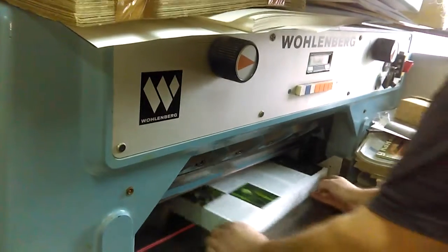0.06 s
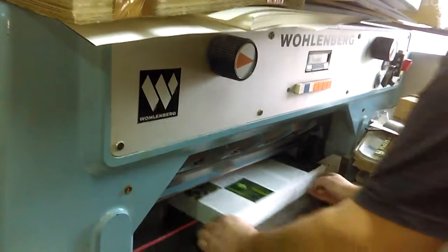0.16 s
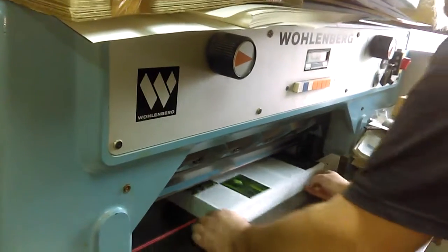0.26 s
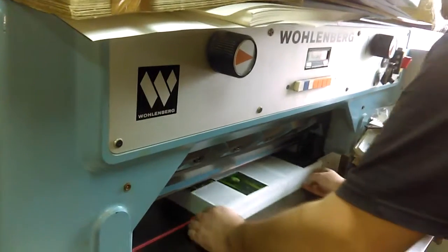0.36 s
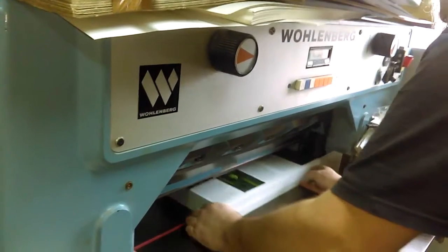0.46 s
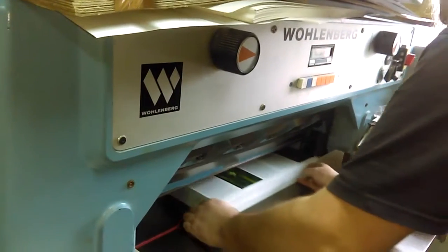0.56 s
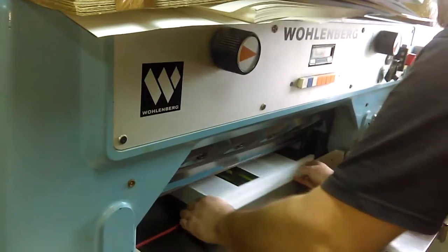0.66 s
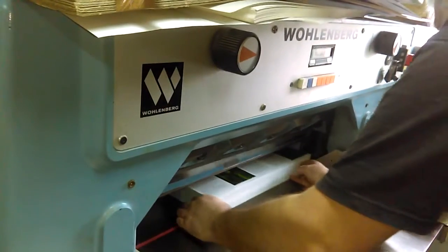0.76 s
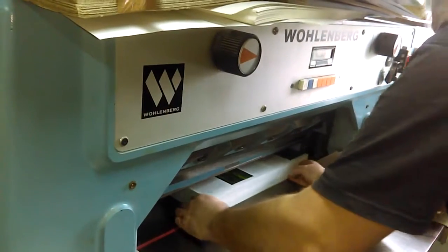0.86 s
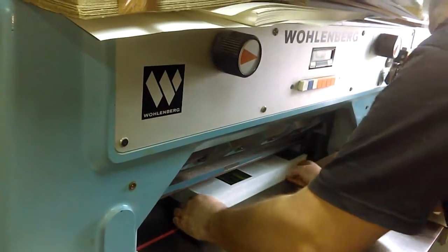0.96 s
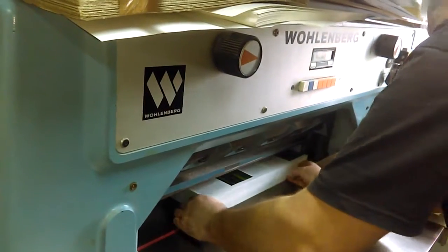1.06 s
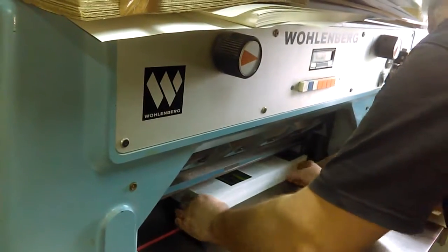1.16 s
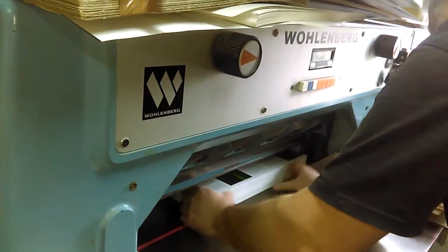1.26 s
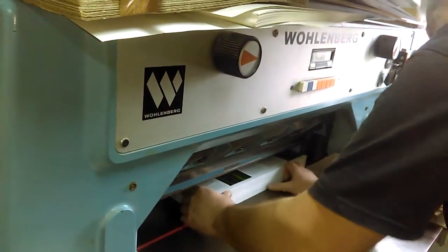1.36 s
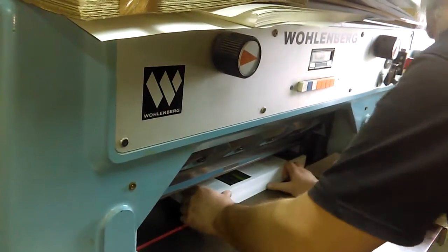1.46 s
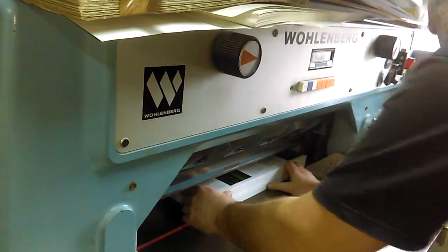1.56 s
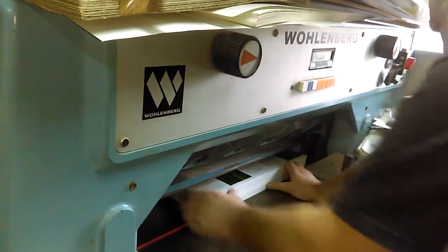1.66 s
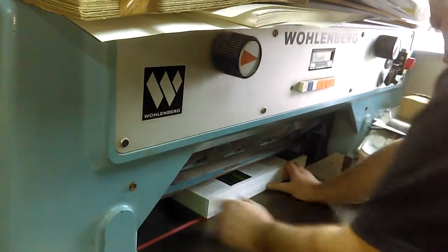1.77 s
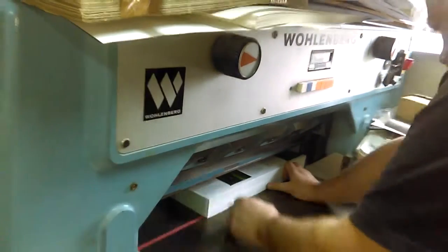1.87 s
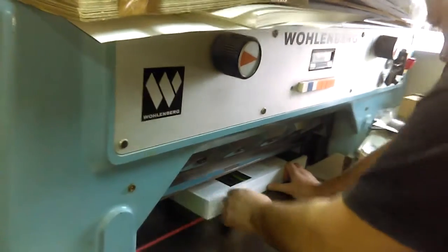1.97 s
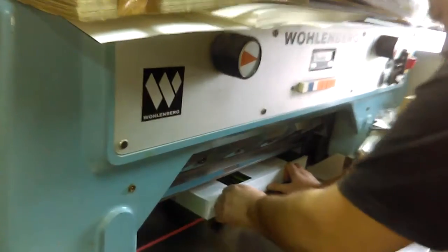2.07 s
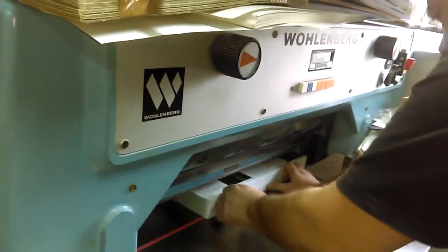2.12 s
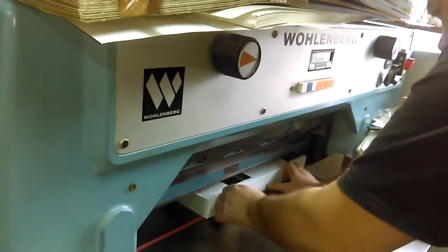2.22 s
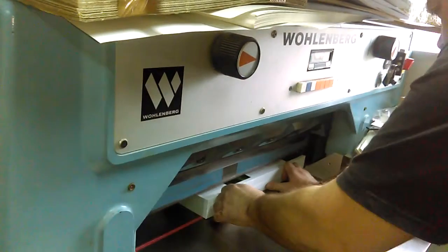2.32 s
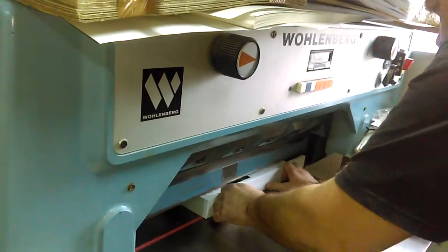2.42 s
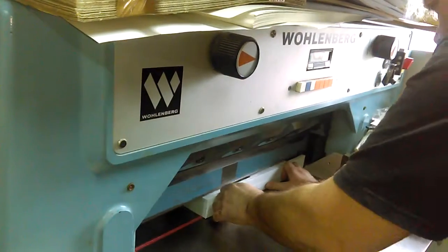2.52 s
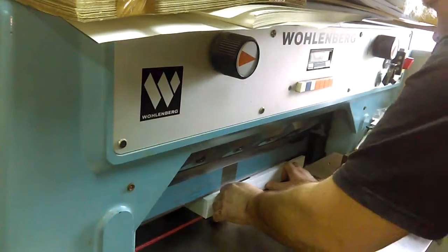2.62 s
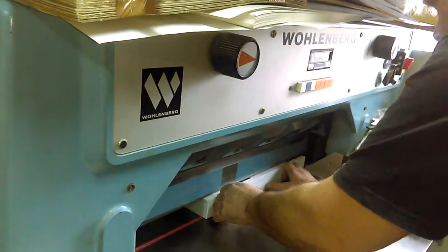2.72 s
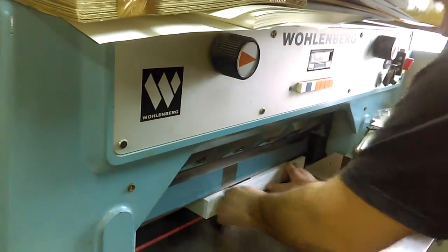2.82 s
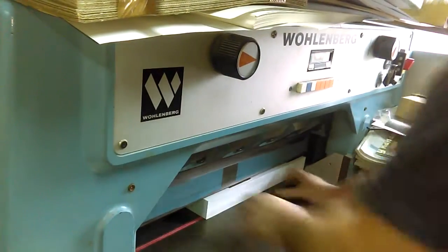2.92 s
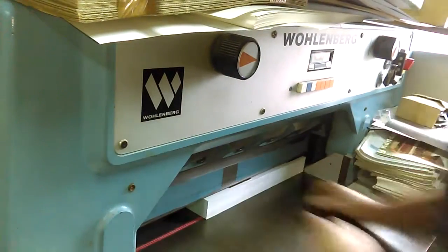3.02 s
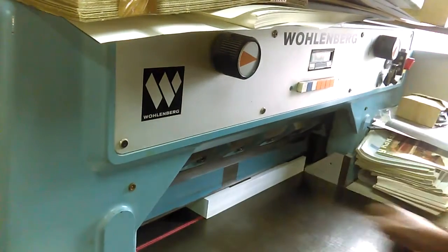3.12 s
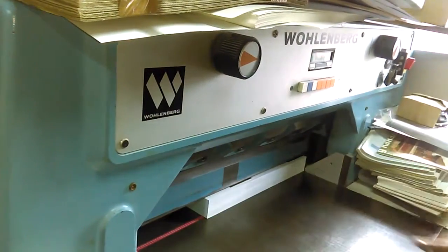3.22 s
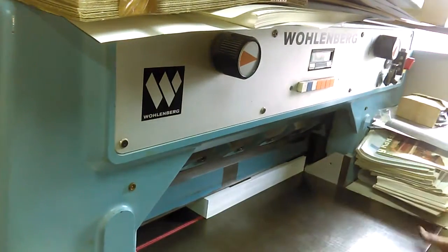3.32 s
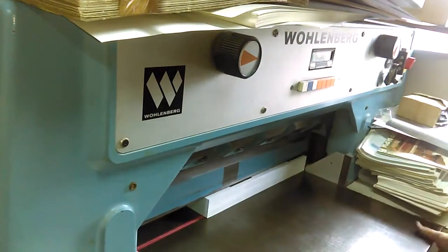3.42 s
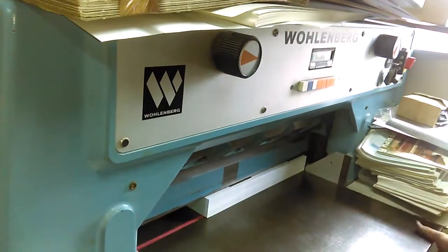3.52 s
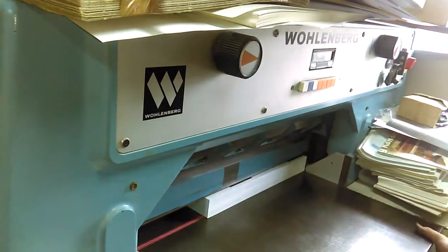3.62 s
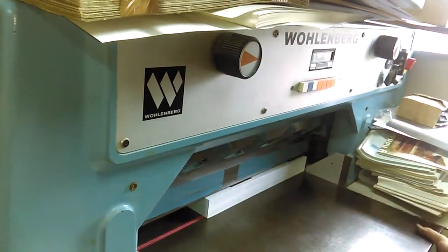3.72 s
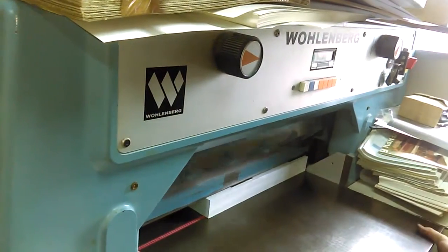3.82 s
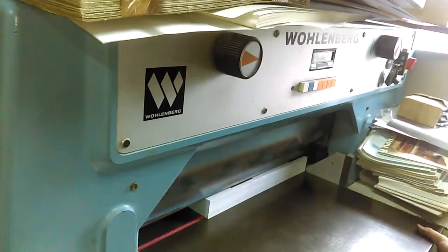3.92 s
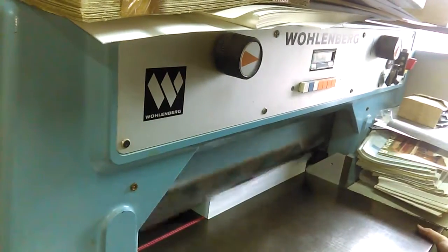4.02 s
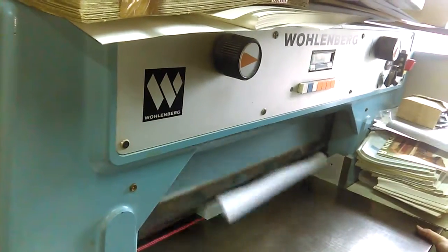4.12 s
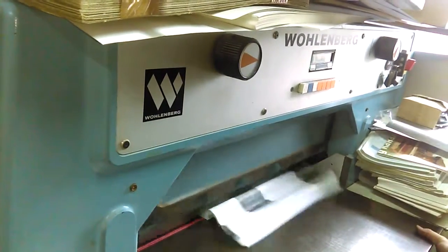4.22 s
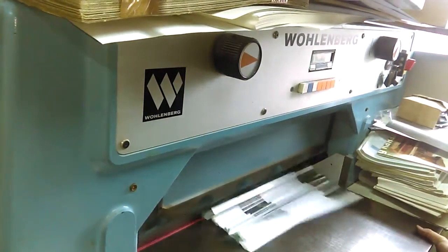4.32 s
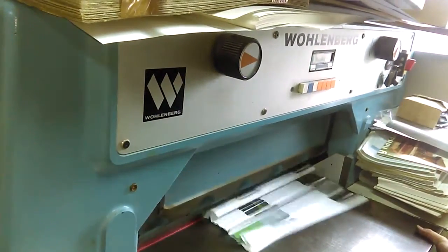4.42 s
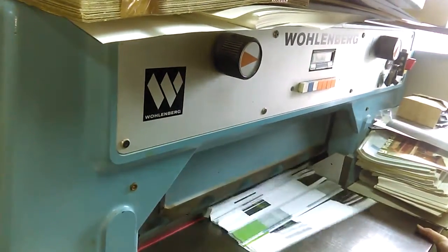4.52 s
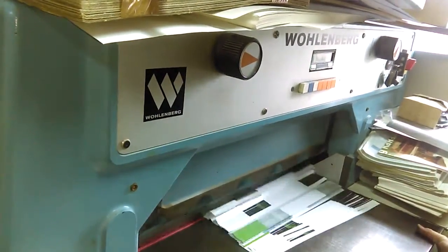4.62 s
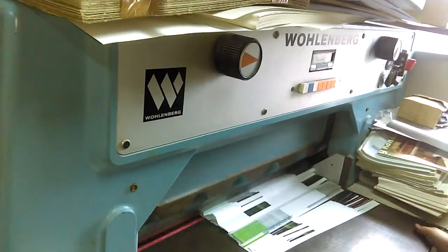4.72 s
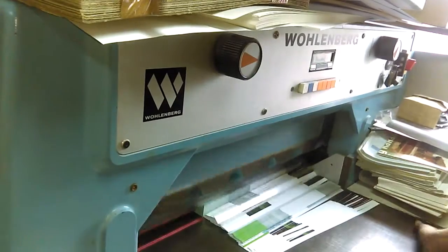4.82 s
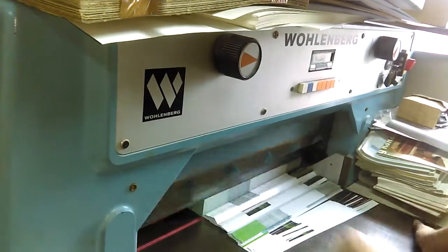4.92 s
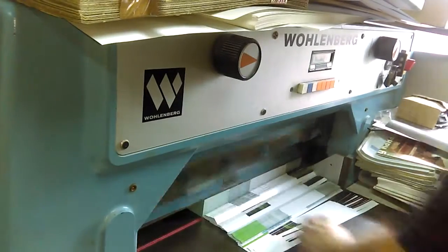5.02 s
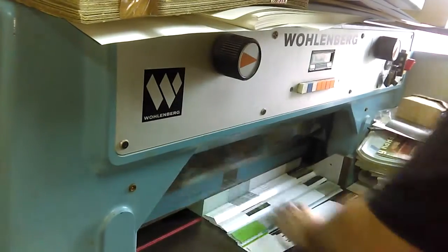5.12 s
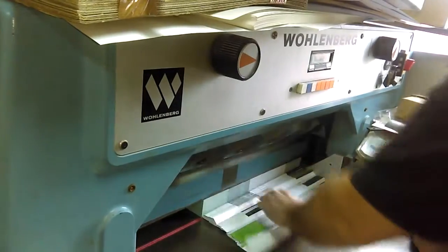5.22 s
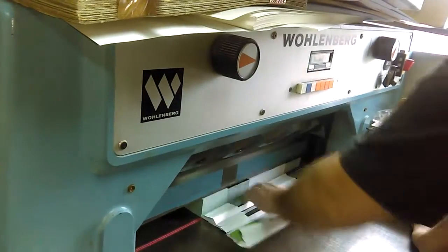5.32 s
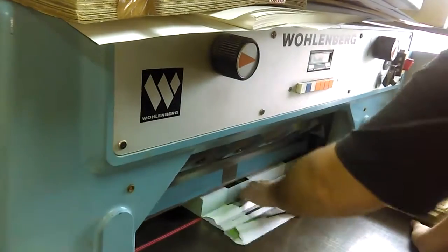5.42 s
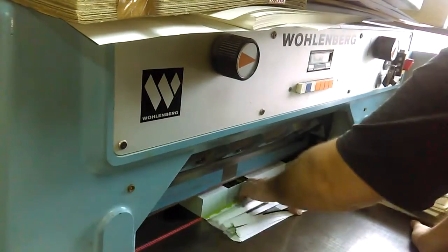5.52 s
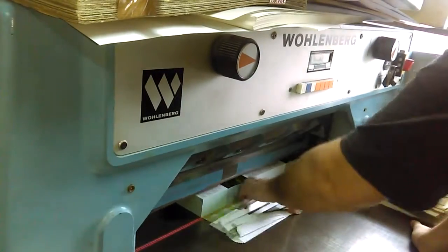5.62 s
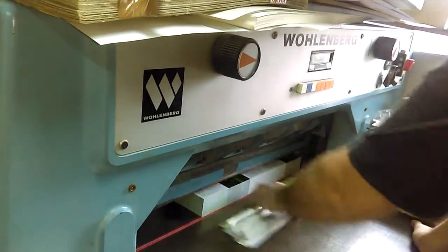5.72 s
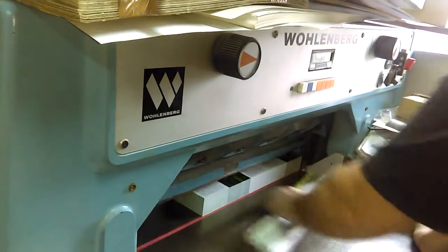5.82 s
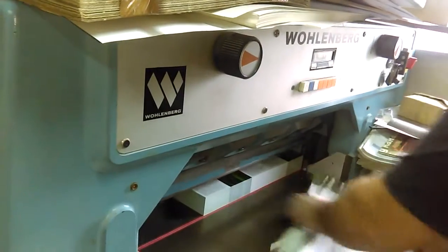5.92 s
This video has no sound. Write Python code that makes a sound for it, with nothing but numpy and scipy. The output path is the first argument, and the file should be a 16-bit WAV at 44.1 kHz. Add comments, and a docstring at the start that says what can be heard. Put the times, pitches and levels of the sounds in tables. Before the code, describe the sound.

Paper knocks and slides over a motor hum, before a guillotine cutter squeals, slams, zips through the stack and clunks to a stop.

```python
"""A small print shop. A guillotine paper cutter idles with a mains hum while a stack is knocked square
and slid under the blade. The clutch bites with a squeal, the pump groans and the clamp slams down.
The knife snaps sheet after sheet: a zip that falls in pitch as the crank slows, over hissing fibres.
The gears carry the knife back up, the brake chirps, and the offcuts are gathered."""
import sys
import numpy as np
from scipy import signal
from scipy.fft import rfft, irfft, next_fast_len
from scipy.io import wavfile

SR = 44100
rng = np.random.default_rng(int(sys.argv[2]) if len(sys.argv) > 2 else 0)


def bounce(signal):
    """Save signal as a 16-bit WAV file at the path given by the first command-line argument."""
    frames = np.transpose(np.atleast_2d(signal))
    limited = np.clip(frames, -1, 1)
    pcm = np.round(limited * 32767).astype(np.int16)
    wavfile.write(sys.argv[1], SR, pcm)


N = 263393
TIME_S = np.arange(N) / SR
FFT_SIZE = next_fast_len(N + SR // 2, True)
BINS_HZ = np.maximum(np.arange(FFT_SIZE // 2 + 1) * SR / FFT_SIZE, 1)
SIDES = np.array([[1], [-1]])   # left, right

MAINS_HZ, SHAFT_HZ = 50, 24.77
CLUTCH_S, CLAMP_TIGHT_S, UPSTROKE_S, BRAKE_S = 3.68, 3.94, 4.6, 5.25
CUT_START_S, ZIP_END_S, CUT_END_S = 4.059, 4.38, 4.45

# Motor hum. Each row: multiple of mains frequency, rms level in dB.
HUM_LINES = [(2, -59), (2.5, -62), (3.5, -67), (4, -56.5), (4.5, -60), (6, -54.5), (8, -70.5), (12.5, -76),
             (14, -61.5), (26, -67.5), (34, -74.5), (36, -70), (37, -77.5), (38, -70.5), (60, -72)]
# Motor whine. Each entry: multiple of mains frequency.
WHINE_MULTIPLES = [12, 16, 18]
# Whine shifts as the operator moves. Each row: time in seconds, level of each of the three lines in dB.
WHINE_LEVELS = [(0, -74, -58, -55.5), (0.55, -62.5, -56, -54), (1.2, -51.5, -55, -55.5),
                (2.0, -53, -57, -56), (2.55, -68, -58.5, -60), (3.0, -59.5, -56.5, -52),
                (3.55, -54.5, -51, -47), (5.6, -61, -58, -56), (5.97, -58, -56, -46)]
# Gear tooth tones. Each row: multiple of shaft speed, rms level in dB.
TOOTH_LINES = [(4, -39.5), (5, -40), (6, -44), (10, -34), (14, -38), (17, -51.5), (20, -46), (25, -47.5),
               (30, -45), (36, -50.5), (60, -49.5), (70, -59), (90, -47.5), (111, -53)]

# Noise colours. Each row: frequency in Hz, relative spectral density in dB.
FAN_SPECTRUM = [(25, -17), (48, -15), (72, -15), (100, 0.5), (210, -6), (400, -8.5), (800, -8.5),
                (1050, -10.5), (1800, -16), (2500, -21.5), (4500, -31), (7000, -35), (10000, -31.5),
                (16000, -42)]
SLIDE_SPECTRUM = [(1200, -24), (2200, -3), (3000, -2.5), (6500, -11), (9500, -0.5), (12500, -6.5),
                  (16000, -18)]
KNOCK_SPECTRUM = [(35, -38), (60, -9.5), (417, -1.5), (615, -5.5), (886, -4.5), (1040, 2), (1140, 1.5),
                  (1310, -4.5), (1970, -7), (3040, -18.5), (3730, -20.5), (4470, -30), (9290, -40),
                  (14000, -51)]
TAP_SPECTRUM = [(710, -52), (1200, -5), (1680, -3.5), (2230, -3.5), (4130, -4.5), (6720, -9.5), (8720, -4),
                (13500, -16), (16000, -36)]
CLUTCH_SPECTRUM = [(41, -32.5), (70, -27), (182, -3), (368, -12), (494, -19), (815, -5), (913, -12.5),
                   (2070, -9.5), (2540, -15), (2780, -14.5), (4090, -20.5), (5500, -13), (7220, -21),
                   (12500, -16.5), (16000, -41)]
CLAMP_SPECTRUM = [(41, -45), (70, -19), (204, -5.5), (268, -12.5), (336, 2.5), (412, -7), (1150, -12),
                  (1250, -13.5), (1650, -11), (2780, -24), (3260, -25.5), (7060, -40.5), (10900, -30),
                  (13600, -40), (16000, -75)]
BRAKE_SPECTRUM = [(41, -40), (70, -14), (256, -5), (336, -2.5), (494, 1), (541, -10.5), (797, -7.5),
                  (1510, -15), (2660, -14.5), (3740, -27), (5140, -28.5), (6750, -31.5), (10400, -29.5),
                  (11400, -33), (16000, -44)]
WHIRR_SPECTRUM = [(40, -16), (70, -12), (120, -7), (220, -15), (400, -14), (780, -12), (1200, -14),
                  (1900, -22), (3000, -23.5), (3600, -32), (5500, -33), (7200, -43.5), (9500, -31.5),
                  (15500, -51)]
FIBRE_SPECTRUM = [(1500, -9.5), (2500, 0), (3300, -1.5), (4200, -7), (5200, -4.5), (8300, -2),
                  (11000, -2.5), (13300, -7), (16000, -22)]
CRUNCH_SPECTRUM = [(120, -34), (300, -33), (470, -2), (900, 5), (1300, 0), (2200, -18), (3500, -12),
                   (6000, -18), (9000, -45)]
# Colour of the zip. Each row: frequency in Hz, gain in dB.
ZIP_RESPONSE = [(250, -1), (500, 1.5), (1200, -0.5), (2200, 8), (3500, 1), (5500, -6), (8500, 1.5),
                (12000, 5)]

# Impacts. Each row: start in seconds, level in dB, T60 as a multiple of the shop's, tilt in dB/octave.
STACK_HITS = [(0.323, -38, 0.53, -0.5), (0.356, -37, 0.72, -1.5), (0.973, -24.5, 0.8, -0.1),
              (2.061, -20, 0.94, 1)]
EDGE_TAPS = [(1.665, -48.5, 0.83, -1.5), (2.535, -52.5, 0.26, 3.5), (2.656, -48.5, 1.05, 0),
             (2.811, -53, 0.84, 2), (2.838, -47.5, 0.64, 0.3), (3.422, -45.5, .9, -0.5),
             (3.46, -46, 0.98, 0), (3.631, -37, 0.73, 0.5), (5.428, -38, 1.3, -1.6), (5.506, -38, 1.53, -1),
             (5.59, -46, 0.33, 0.5), (5.712, -41, 1.2, -4), (5.948, -31.5, 0.43, 0)]
CLUTCH_HITS = [(3.678, -24, 0.82, 0.5), (3.698, -23.5, 0.8, -1), (3.728, -30, 0.99, 2.5)]
CLAMP_AND_KNIFE_HITS = [(3.881, -10, 0.99, 0.1), (4.068, -11.5, 0.66, 1), (4.46, -25.5, 2.2, -2),
                        (4.554, -19.5, 1.14, -2)]
BRAKE_HITS = [(5.215, -26.5, 1.4, 1), (5.252, -20, 0.9, 2.5), (5.268, -18, 0.99, -0.7),
              (5.288, -26, 1.45, -2.1)]
# Paper pushed over the table. Each row: centre in seconds, length in seconds, relative level in dB.
PAPER_PUSHES = [(0.028, 0.46, -61), (0.85, 0.22, -68), (1.254, 0.081, -64), (1.936, 0.37, -65),
                (2.423, .12, -58), (2.624, 0.14, -55), (3.03, 0.16, -61.5), (3.218, .06, -59),
                (5.7, 0.16, -54.5), (5.935, .16, -51.5)]
# Paper squeaks. Each row: start in seconds, frequency in Hz, level in dB.
PAPER_SQUEAKS = [(0.357, 655, -21.5), (0.368, 506, -24.5), (5.567, 1645, -38), (5.589, 3160, -36)]
# Clutch, then brake grips. Each row: start in seconds, level in dB, pitch ratio.
LINING_GRIPS = [(3.716, 0, 0.99), (5.265, -15, .982)]
# Jolts to frame and covers. Each row: start in seconds, level in dB.
FRAME_KICKS = [(0.99, -56), (2.08, -49), (2.7, -57), (3.89, -27.5), (5.26, -41.5)]
COVER_KICKS = [(3.684, -26), (4.085, -31), (4.47, -29.5), (4.559, -31), (5.27, -38)]

# Resonances. Each row: centre in Hz, half-width in Hz, gain at the centre in dB.
PUMP_RESONANCES = [(164, 9.7, -15), (491, 33, -1.5), (754, 34, -15), (993, 13, -12), (1400, 21, -34)]
GEAR_CASE_RESONANCES = [(2300, 63, 1.5), (2750, 96, 8), (4160, 230, 7.5), (10340, 40, 8)]
KNIFE_BEAM_RESONANCES = [(2000, 30, 1), (1640, 63, 5), (1436, 66, -9.5), (1235, 83, 12.5), (813, 93, 9.5),
                         (634, 60, 2), (450, 28, 8.5)]
# Ringing modes. Each row: frequency in Hz, relative level in dB, T60 in seconds.
LINING_MODES = [(5060, -22.5, 0.23), (5418, -11.5, .16), (9840, -10.5, 0.095), (10630, -2.5, 0.077)]
TABLE_MODES = [(447, -1.5, 0.033), (1046, -15, 0.096), (2076, -17, 0.069), (2693, -20.5, 0.24)]
COVER_MODES = [(103.5, -1, 0.36), (123.7, -2, 0.71), (166.1, -4.5, 0.59)]
FRAME_MODES = [(36.6, 0, 1.48)]
KNIFE_MODES = [(319, -23, 0.18), (2850, -8, 0.057)]
CLACK_MODES = [(1140, -25, 0.018), (2005, -16.5, 0.017)]

# Shop decay. Each row: frequency in Hz, T60 in seconds.
SHOP_DECAY = [(100, 0.97), (260, 0.28), (700, 0.28), (1800, 0.2), (5000, 0.26), (14000, 0.15)]
# Microphone likeness. Each row: frequency in Hz, correlation (negative counts as zero).
MIC_CORRELATION = [(60, 0.99), (250, 0.98), (500, 0.75), (1000, 0.83), (2000, 0.061), (8000, -0.25),
                   (16000, 0.59)]
# Microphone shading. Each row: frequency in Hz, left minus right in dB.
MIC_BALANCE = [(40, 0), (130, 0.5), (300, -0.5), (600, 0), (1050, 0), (1700, -11), (2800, -7),
               (4500, -10.5), (7300, -9), (11500, -3)]


def from_db(db):
    """Decibels to gain."""
    return 10 ** (np.asarray(db) / 20)


def unit_rms(x):
    """Scale to unit power."""
    return x / np.sqrt(np.mean(x ** 2) + 1e-20)


def at_hz(table, hz):
    """Interpolate a table along log frequency."""
    table_hz, values = np.transpose(table)
    return np.interp(np.log(hz), np.log(table_hz), values)


def lift_db(resonances, hz):
    """Summed boost or dip of resonances at hz."""
    return sum(db / (1 + ((hz - centre_hz) / width_hz) ** 2) for centre_hz, width_hz, db in resonances)


def drift(rate_hz):
    """Smooth random wander, unit rms."""
    pole = np.exp(-20 * np.pi * rate_hz / SR)
    white = rng.standard_normal(N // 10 + 4002)
    slow = signal.lfilter([1], [1, -2 * pole, pole * pole], white)[4000:]
    return np.interp(np.arange(N) / 10, np.arange(len(slow)), unit_rms(slow))


def stereo(three_signals, gain):
    """Mix one shared and two private signals to a coloured pair of unit power."""
    shared = np.clip(at_hz(MIC_CORRELATION, BINS_HZ), 0, 1)
    spectra = rfft(three_signals, FFT_SIZE) * gain
    pair = np.sqrt(shared) * spectra[0] + np.sqrt(1 - shared) * spectra[1:]
    return unit_rms(irfft(pair, FFT_SIZE)[:, :N])


def noise(spectrum):
    """Coloured stereo noise, unit power."""
    return stereo(rng.standard_normal((3, N)), from_db(at_hz(spectrum, BINS_HZ)))


def swell(age_s, rise_s, t60_s):
    """Quick rise, exponential decay."""
    return (1 - np.exp(-age_s / rise_s)) * from_db(-60 * age_s / t60_s)


def held(start_s, stop_s, rise_s, t60_s):
    """Linear attack, hold, exponential release."""
    attack = np.clip((TIME_S - start_s) / rise_s, 0, 1)
    return attack * from_db(-60 * np.maximum(TIME_S - stop_s, 0) / t60_s)


def after(start_s, length_s):
    """An event's sample slice and age in seconds."""
    span = slice(int(start_s * SR), min(N, int((start_s + length_s) * SR)))
    return span, TIME_S[span] - TIME_S[span.start]


def blows(hits, spectrum, rise_s, softening=0.43):
    """Impacts excite dense modes; each octave decays at its own rate."""
    dense_modes = rfft(noise(spectrum), FFT_SIZE)
    out = np.zeros((2, N))
    for hz in 1000 * 2. ** np.arange(-4, 5):
        power = np.zeros(N)
        for start_s, db, t60_ratio, tilt_db in hits:
            span, age_s = after(start_s, 1)
            contact_s = rise_s * 2 ** (-softening * tilt_db)   # softer contact: duller, slower
            envelope = swell(age_s, contact_s, t60_ratio * at_hz(SHOP_DECAY, hz))
            power[span] += (from_db(db + tilt_db * np.log2(hz / 1000)) * envelope) ** 2
        band = np.maximum(1 - abs(np.log2(BINS_HZ / hz)), 0)
        out += np.sqrt(power) * irfft(dense_modes * band, FFT_SIZE)[:, :N]
    return out


def ring(start_s, modes, wobble, rise_s, level_db=0, pitch_ratio=1):
    """Briefly excited modes; wobble is the relative pitch wander."""
    out = np.zeros((2, N))
    span, age_s = after(start_s, 0.5)
    for hz, db, t60_s in modes:
        pitch_hz = pitch_ratio * hz * (1 + wobble * drift(200)[span])
        offset_rad = SIDES * np.pi / 4 * min(hz / 4000, 1)   # short waves arrive out of step
        tone = np.sin(2 * np.pi * np.cumsum(pitch_hz) / SR + offset_rad)
        out[:, span] += from_db(level_db + db) * swell(age_s, rise_s, t60_s) * tone
    return np.sqrt(2) * out


def boom(jolts, modes, rise_s):
    """Each jolt swings the same low modes."""
    out = np.zeros(N)
    for start_s, level_db in jolts:
        span, age_s = after(start_s, 2.3)
        for hz, db, t60_s in modes:
            tone = np.sin(2 * np.pi * (hz * age_s + rng.random()))
            out[span] += from_db(level_db + db) * swell(age_s, rise_s, t60_s) * tone
    return np.sqrt(2) * out


def shop_echo(x, t60_s, wet_db=-3.5):
    """Direct sound plus dense reflections, different on each side."""
    age_s = TIME_S[:SR // 2]
    tail = rng.standard_normal((2, len(age_s))) * swell(age_s, 0.00061, t60_s)
    tail /= np.sqrt(np.sum(tail ** 2, axis=1, keepdims=True))
    return x + from_db(wet_db) * signal.fftconvolve(x, tail, axes=1)[:, :N]


def microphones(x, left_lead_s=0.00014):
    """Sound reaches the left microphone first, its treble shaded."""
    shading = from_db(SIDES * at_hz(MIC_BALANCE, BINS_HZ) / 2)
    lead = np.exp(1j * np.pi * BINS_HZ * left_lead_s * SIDES)
    return irfft(rfft(x, FFT_SIZE) * shading * lead, FFT_SIZE)[:, :N]


def motor(waver_db=1.65, spread_rad=0.44, throb_depth=0.11, fan_db=-51):
    """Magnetic hum and throbbing fan noise; the rotor turns at half the mains frequency."""
    times_s, *levels_db = np.transpose(WHINE_LEVELS)
    whine_db = [np.interp(TIME_S, times_s, line_db) for line_db in levels_db]
    hum = np.zeros((2, N))
    for multiple, db in HUM_LINES + list(zip(WHINE_MULTIPLES, whine_db)):
        hz = MAINS_HZ * multiple
        phase = rng.uniform(0, 2 * np.pi) + spread_rad * rng.normal(size=(2, 1)) * min(hz / 600, 1)
        hum += np.sqrt(2) * from_db(db + waver_db * drift(1.64)) * np.sin(2 * np.pi * hz * TIME_S + phase)
    throb = 1 + throb_depth * np.cos(2 * np.pi * 2 * MAINS_HZ * TIME_S)
    return hum + from_db(fan_db) * noise(FAN_SPECTRUM) * throb


def paper_slides(grain_db=0.2, trim_db=-1.5, catches_per_s=12, catch_db=2.5, catch_t60_s=0.079):
    """Friction hiss swells with each push and flares where a sheet edge catches."""
    effort = sum(from_db(db) * np.exp(-2 * ((TIME_S - centre_s) / length_s) ** 2)
                 for centre_s, length_s, db in PAPER_PUSHES)
    catches = rng.random(N) < catches_per_s / SR
    pole = from_db(-60 / (catch_t60_s * SR))
    flares = from_db(catch_db) * signal.lfilter([1], [1, -pole], catches + 1e-18)
    grain = from_db(grain_db * drift(50) + trim_db)
    return effort * grain * (1 + flares) * noise(SLIDE_SPECTRUM)


def paper_knocks():
    """The stack is knocked square; sheet edges tap the table."""
    knocks = blows(STACK_HITS, KNOCK_SPECTRUM, rise_s=0.0044)
    return knocks + blows(EDGE_TAPS, TAP_SPECTRUM, rise_s=0.0008)


def paper_squeaks(t60_s=0.065):
    """Paper squeaks on the table."""
    return sum(ring(start_s, [(hz, db, t60_s)], wobble=0.13, rise_s=0.003)
               for start_s, hz, db in PAPER_SQUEAKS)


def table_ring():
    """The steel table rings under each knock of the stack."""
    return sum(ring(start_s, TABLE_MODES, wobble=0.045, rise_s=0.0057, level_db=db)
               for start_s, db, *_ in STACK_HITS)


def offcut_clack():
    """One hard clack as the offcuts are gathered."""
    return ring(start_s=5.947, modes=CLACK_MODES, wobble=0.038, rise_s=0.0013)


def frame_and_covers(waver_db=2.5):
    """The heavy frame sways when jolted; the covers boom as the drive's load changes."""
    frame = boom(FRAME_KICKS, FRAME_MODES, rise_s=0.029)
    covers = boom(COVER_KICKS, COVER_MODES, rise_s=0.012)
    return (frame + covers) * from_db(waver_db * drift(6.2))


def pump(start_db=-35.5, growth_db_per_s=31):
    """Oil rushing to the clamp excites resonances, louder as pressure builds."""
    response = sum(from_db(db) / (1 + ((BINS_HZ - hz) / width_hz) ** 2)
                   for hz, width_hz, db in PUMP_RESONANCES)
    pumped_s = np.clip(TIME_S, CLUTCH_S, CLAMP_TIGHT_S) - CLUTCH_S
    flow = held(CLUTCH_S, CLAMP_TIGHT_S, rise_s=0.02, t60_s=0.27)
    groan = stereo(rng.standard_normal((3, N)), response)
    return from_db(start_db + growth_db_per_s * pumped_s) * flow * groan


def gear_whirr(turns, level_db=-33.4, rattle_gain=0.38, surge_depth=0.079):
    """The same rough teeth meet every turn, in four surges, with loose rattle on top."""
    turn_samples = int(SR / SHAFT_HZ)
    roughness = rng.standard_normal((3, turn_samples))
    contact = roughness[:, (turns % 1 * turn_samples).astype(int)]
    rattle = rattle_gain * rng.standard_normal((3, N))
    surge = 1 + surge_depth * np.cos(2 * np.pi * 4 * turns)
    case_db = at_hz(WHIRR_SPECTRUM, BINS_HZ) + lift_db(GEAR_CASE_RESONANCES, BINS_HZ)
    load = from_db(level_db) * held(CLUTCH_S, BRAKE_S, rise_s=0.21, t60_s=0.33)
    return load * stereo((contact + rattle) * surge, from_db(case_db))


def gears(slip=0.0006, waver_db=0.94, flutter_rad=0.0064, downstroke_db=-6.5, load_shift_s=0.16):
    """Whirr and tooth tones from clutch to brake; the tones grow as the knife lifts."""
    turns = np.cumsum(SHAFT_HZ * (1 + slip * drift(2.8))) / SR
    whirr = gear_whirr(turns)
    tones = np.zeros(N)
    for multiple, db in TOOTH_LINES:
        gain = np.sqrt(2) * from_db(db + waver_db * drift(10))
        phase = 2 * np.pi * (multiple * turns + rng.random())
        tones += gain * np.sin(phase + flutter_rad * multiple * drift(40))
    descending = np.clip(1 - (TIME_S - UPSTROKE_S) / load_shift_s, 0, 1)
    meshing = held(CLUTCH_S, BRAKE_S, rise_s=0.03, t60_s=0.79)
    return whirr + meshing * from_db(downstroke_db * descending) * tones


def lining_chirps():
    """The friction lining squeals as clutch or brake grips."""
    return sum(ring(start_s, LINING_MODES, wobble=0.017, rise_s=0.01, level_db=db, pitch_ratio=ratio)
               for start_s, db, ratio in LINING_GRIPS)


def stroke_impacts():
    """The clutch bites, clamp and knife land, the brake grips."""
    clutch = blows(CLUTCH_HITS, CLUTCH_SPECTRUM, rise_s=0.0039)
    landings = blows(CLAMP_AND_KNIFE_HITS, CLAMP_SPECTRUM, rise_s=0.0025)
    brake = blows(BRAKE_HITS, BRAKE_SPECTRUM, rise_s=0.0022)
    return clutch + landings + brake


def knife_ring():
    """The blade rings as it lands."""
    return ring(start_s=4.07, modes=KNIFE_MODES, wobble=0.045, rise_s=0.0013)


def fibres(speed, sheet_phase, hiss_db=-19.5, db_per_doubling=4.5, crunch_db=-18.5, grain_db=1.5):
    """Parting fibres hiss, louder at speed; the last sheets crunch against the cutting stick."""
    cutting = held(CUT_START_S, CUT_END_S, rise_s=0.0056, t60_s=0.2)
    hiss = from_db(hiss_db + db_per_doubling * np.log2(speed)) * cutting
    crunch = from_db(crunch_db) * held(start_s=4.3, stop_s=4.41, rise_s=0.098, t60_s=0.35)
    grain = from_db(grain_db * drift(220)) * (1 + 0.15 * np.cos(sheet_phase))
    return grain * (hiss * noise(FIBRE_SPECTRUM) + crunch * noise(CRUNCH_SPECTRUM))


def sheet_zip(speed, sheets_per_s, sheet_phase, level_db=-22.5, ragged_db=3, scatter_rad=0.51):
    """One snap per sheet, merged to a zip that sweeps through the knife beam's resonances."""
    rasp_db = -2 + 6 * (1 - speed)   # slower snaps stand apart: richer overtones
    snaps = np.zeros((2, N))
    for harmonic in range(1, 8):
        hz = harmonic * sheets_per_s
        db = at_hz(ZIP_RESPONSE, hz) + lift_db(KNIFE_BEAM_RESONANCES, hz)
        if harmonic > 1:
            db += rasp_db - 4.5 * np.log2(harmonic)
        # overtones leave from all along the blade and arrive out of step
        offset_rad = scatter_rad * (harmonic - 1) * drift(23) * SIDES
        snaps += from_db(db + ragged_db * drift(74)) * np.sin(harmonic * sheet_phase + offset_rad)
    envelope = from_db(level_db) * held(CUT_START_S, ZIP_END_S, rise_s=0.057, t60_s=0.33)
    return shop_echo(snaps * envelope, t60_s=0.29)


def knife_cut(entry_sheets_per_s=2066, slowing_power=1.39, entry_jitter=0.021):
    """The blade slows with the crank and meets the sheets less often, less regularly."""
    time_left = np.clip((UPSTROKE_S - TIME_S) / (UPSTROKE_S - CUT_START_S), 0.1, 1)
    speed = time_left ** slowing_power   # 1 at entry
    sheets_per_s = entry_sheets_per_s * speed
    jitter = entry_jitter / np.sqrt(speed) * drift(243.4)
    sheet_phase = 2 * np.pi * np.cumsum(sheets_per_s * (1 + jitter)) / SR
    return sheet_zip(speed, sheets_per_s, sheet_phase) + fibres(speed, sheet_phase)


def scene():
    """Paper handling and idle motor around one cutting stroke."""
    paper = paper_knocks() + paper_slides()
    machine = stroke_impacts() + motor() + gears() + pump()
    ringing = lining_chirps() + paper_squeaks() + table_ring() + knife_ring() + offcut_clack()
    ringing = shop_echo(ringing, t60_s=0.19)
    return microphones(paper + machine + ringing + frame_and_covers() + knife_cut())


def record(dry):
    """Soft peak limiting, then a 16.2 kHz low-pass."""
    rounded = dry / (1 + dry ** 6) ** (1 / 6)
    lowpass = signal.ellip(10, 0.2, 80, 16200, fs=SR, output="sos")
    return signal.sosfilt(lowpass, rounded)


dry = scene()
out = record(dry)
bounce(out)
```